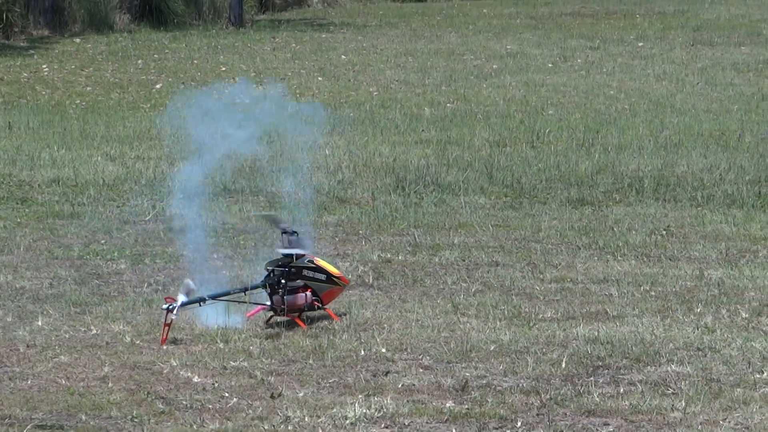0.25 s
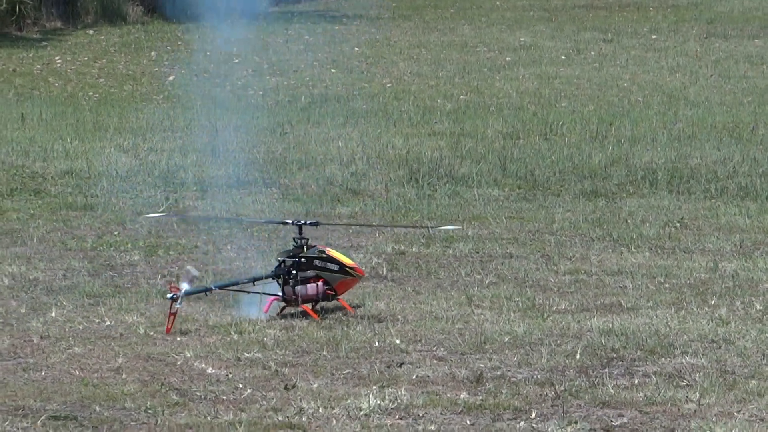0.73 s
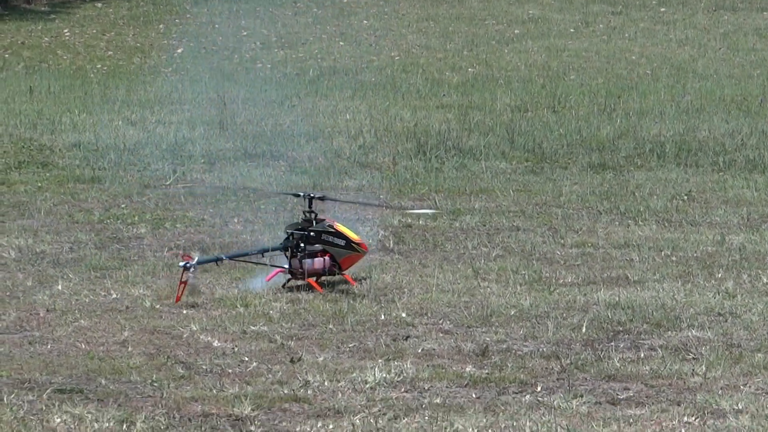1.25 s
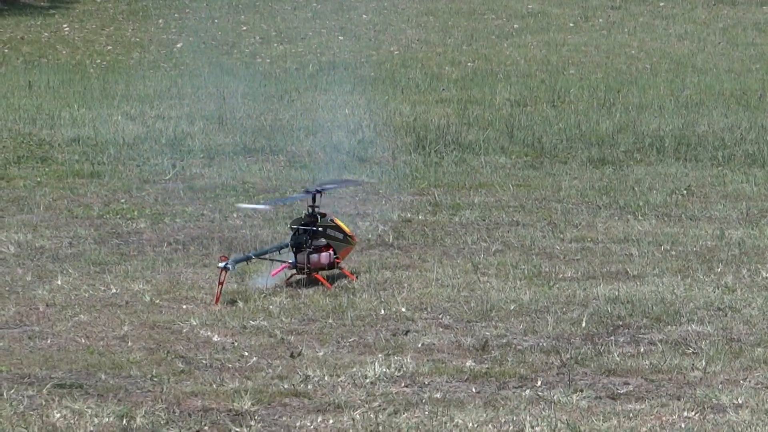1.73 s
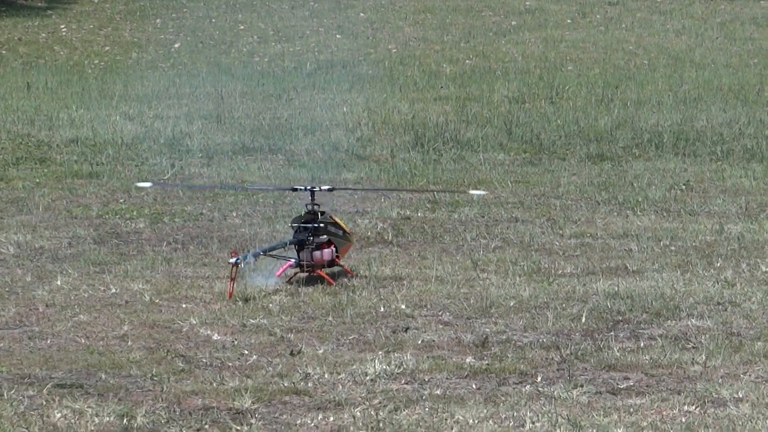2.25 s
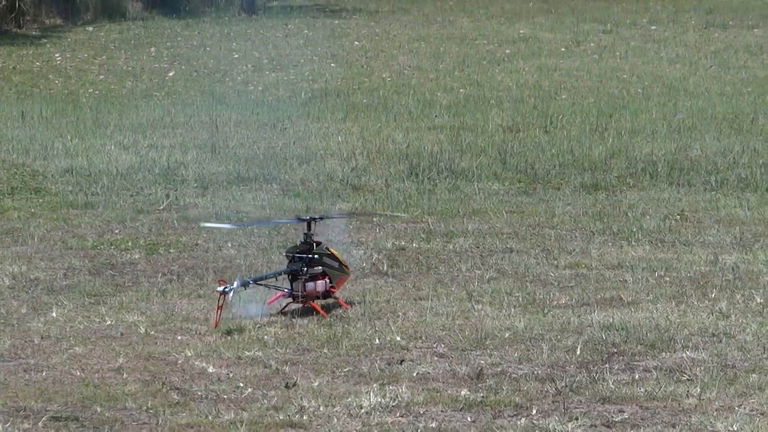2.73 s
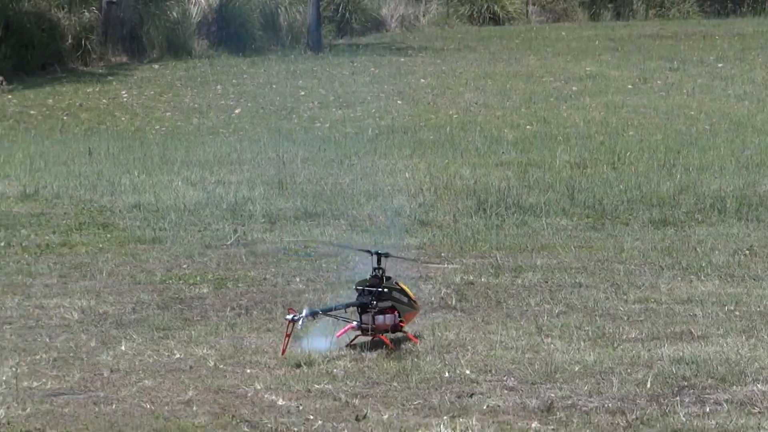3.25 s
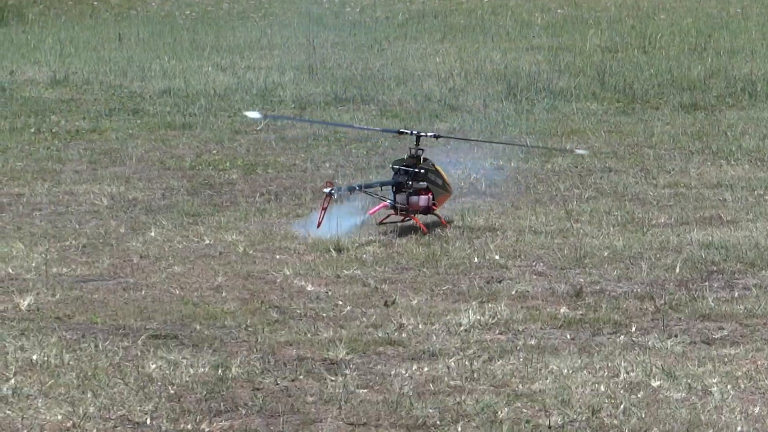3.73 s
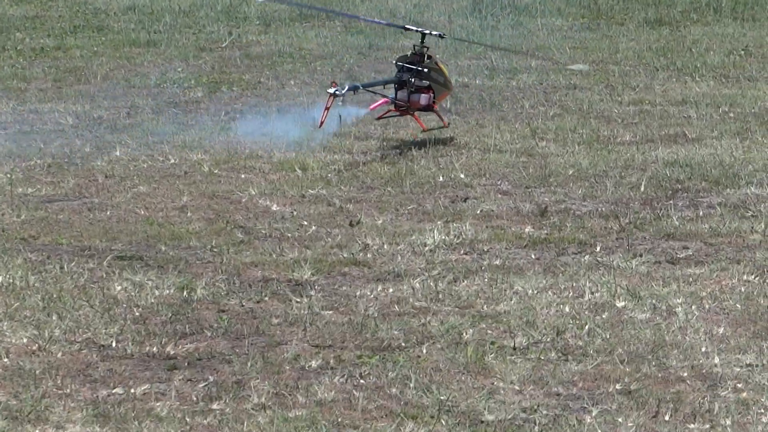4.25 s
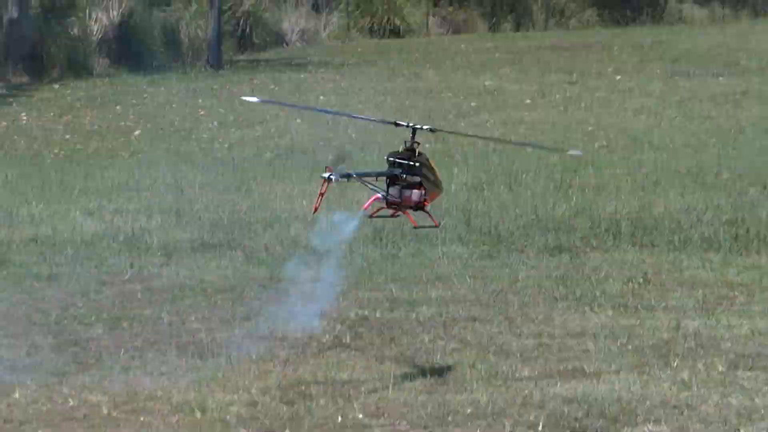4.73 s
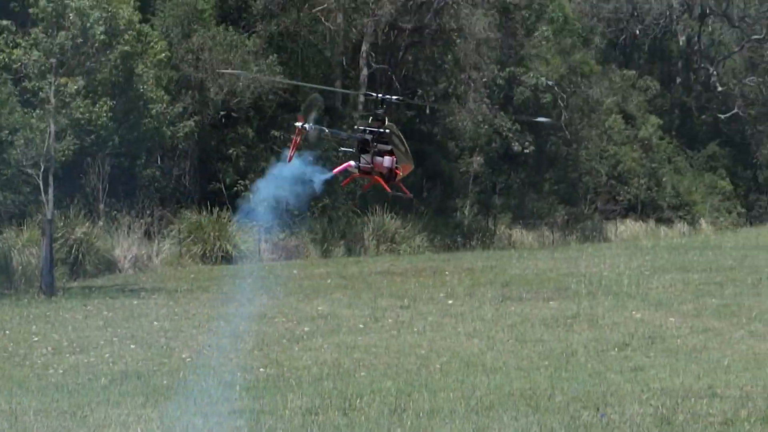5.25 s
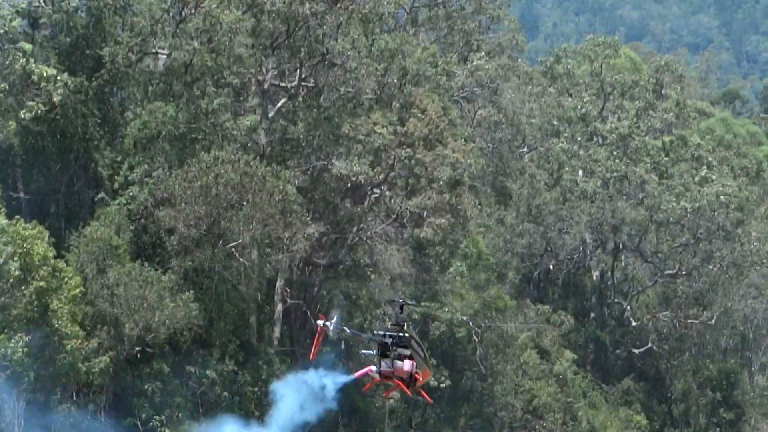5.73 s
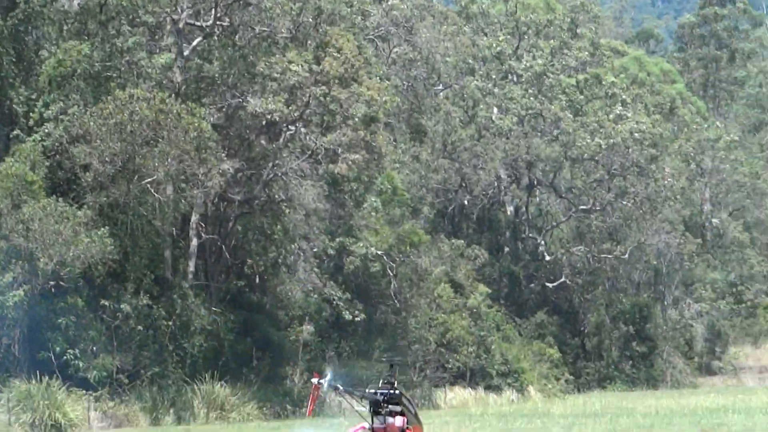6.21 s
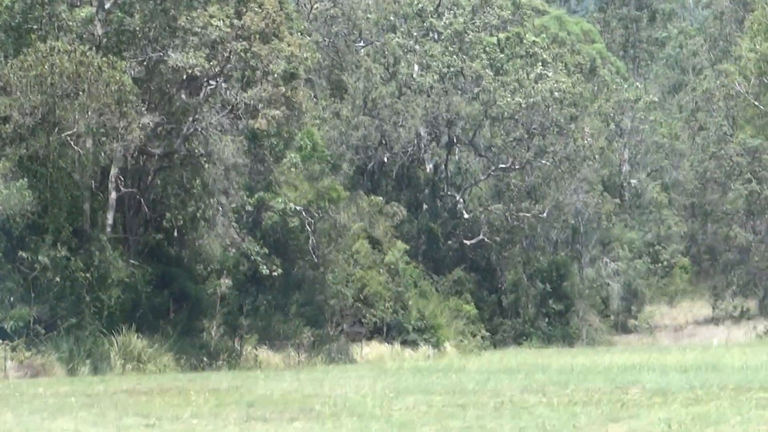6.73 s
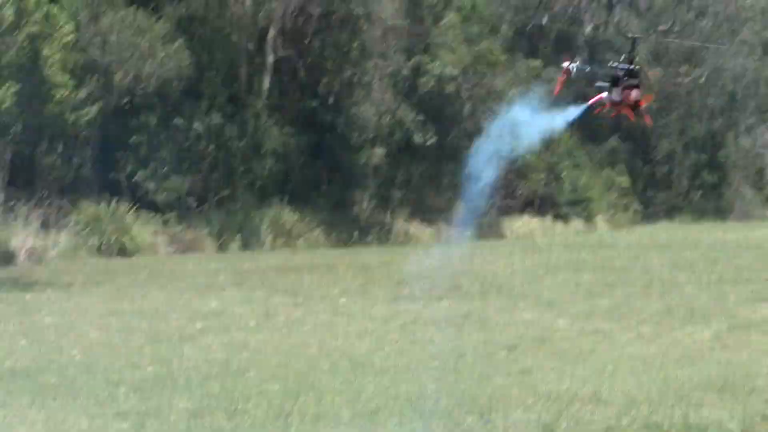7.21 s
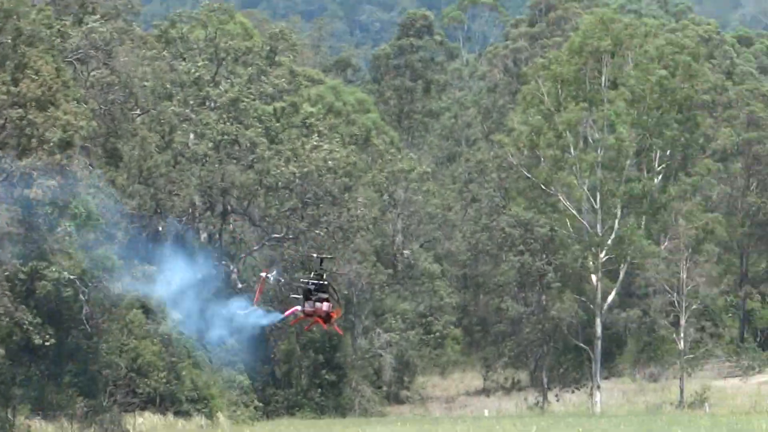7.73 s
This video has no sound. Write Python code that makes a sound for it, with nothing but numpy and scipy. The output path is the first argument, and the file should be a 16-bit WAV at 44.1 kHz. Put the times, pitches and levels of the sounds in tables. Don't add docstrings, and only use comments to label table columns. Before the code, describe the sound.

A small glow-fuel model helicopter is already running on open grass, some way from the microphone, with no noticeable room echo. From 0 to about 2.5 seconds its fast, nasal buzz and strong gear whine stay nearly level, sinking slightly around 1.3, where a faint short low knock touches the camera. A broad, bright hiss of exhaust and air covers everything. From about 2.7 the pitch creeps up while the slower rotor gradually catches up; by 4 to 5 seconds it is airborne, and the sound is harder, rougher and more fluttering. High whines flash and fade as it turns. Near 5.9 the rotor locks to the engine, and the tail blades sing more clearly. Pitch climbs sharply from 5.8 to 6.7, drops around 7, with a fuller low-mid swell, then rises steadily to its highest at 8, cut off still running.

```python
import sys
import numpy as np
from scipy import signal
from scipy.io import wavfile
from scipy.ndimage import uniform_filter1d

SR = 44100
rng = np.random.default_rng(int(sys.argv[2]) if len(sys.argv) > 2 else 0)


def boost(x):
    u = np.asarray(x, float) / 20
    return 10 ** u


def inscribe(sig):
    pcm = np.round(np.clip(np.atleast_2d(sig).T, -1, 1) * 32767)
    wavfile.write(sys.argv[1], SR, pcm.astype(np.int16))


N = 351477

GEAR = 8.5
TAIL_ORDER, MESH_ORDER = 1.06, 20.05
# start_s (centre), half_length_s, pitch_hz, half_width_oct, gain_db
GLINTS = [(.7, 0.67, 4700, .08, 4), (2.3, 0.8, 4600, .08, -3), (3.6, .35, 4750, 0.074, 5),
          (5, .5, 4950, .05, 3), (4.64, .25, 3650, 0.086, 2), (4.9, .7, 12400, .06, 14),
          (5.88, .17, 5040, 0.08, 9.5), (6.3, .25, 8100, .1, 13), (6.45, .1, 5605, .08, -6),
          (6.92, .08, 5500, .08, -7), (7.12, 0.072, 5460, 0.11, 9), (7.4, 0.079, 5650, .08, -5),
          (6.1, .2, 8550, .1, -5), (7.9, 0.3, 8700, .12, -12), (7.1, .8, 15000, .15, -16),
          (4.3, 0.16, 7350, .05, 6.5), (7.97, 0.15, 5950, .1, 8.5)]


def walk(rate):
    block = 32
    hold = int(SR / rate / block)
    coarse = np.repeat(rng.standard_normal(N // block // hold + 2), hold)
    coarse = uniform_filter1d(uniform_filter1d(coarse, hold), hold)
    return 1.3 * np.interp(np.arange(N) / block, np.arange(len(coarse)), coarse)


def curve(table):
    s, value = np.transpose(table)
    return np.interp(np.arange(N) / SR, s, value)


def on_hz(table, hz):
    table_hz, db = np.transpose(table)
    return np.interp(np.log(hz + 1), np.log(table_hz + 1), db)


def tone(turns, db, flutter_db, wander):
    start = rng.random()
    size = np.sqrt(2) * boost(db + flutter_db * walk(rate=40))
    return size * np.sin(2 * np.pi * (turns + start + wander * walk(rate=30)))


def swings(table, s, hz):
    total_db = 0
    for at_s, half_s, centre_hz, octaves, db in table:
        total_db = total_db + db * np.exp(-((s - at_s) / half_s) ** 2 - (np.log2(hz / centre_hz) / octaves) ** 2)
    return total_db


def flown(s, mean_db, *per):
    # time_s, load (-1..1), heading (-1..1), tilt (-1..1)
    flight = [(0.0, -0.75, -0.46, 0.13), (1.17, -0.72, -0.35, 0.15), (1.43, -0.95, 0.068, 0.2),
              (2.45, -0.75, 0.23, 0.089), (3.1, -0.68, -0.27, 0.075), (3.82, 0.31, 0.39, 0.16),
              (4.37, 0.54, 0.72, 0.2), (4.87, 1.0, 0.31, -0.058), (5.23, 0.35, -0.33, -0.54),
              (5.8, 0.42, -0.38, -0.55), (6.13, 0.08, -0.37, -0.51), (6.43, 0.43, 0.16, 0.28),
              (6.61, 0.049, -1.0, 0.47), (6.88, 0.55, 0.031, 0.3), (7.1, -0.095, -0.22, -0.66),
              (7.23, 0.18, -0.69, 0.13), (7.7, 0.7, 0.01, 1.0), (7.97, 0.68, -0.09, 0.6)]
    times_s, *controls = np.transpose(flight)
    return mean_db + sum(db * np.interp(s, times_s, c) for db, c in zip(per, controls))


def order_levels(crank_hz):
    # order, mean_db, db_per_load, db_per_heading, db_per_tilt
    orders = [
        (1.0, -48, 6.5, -2.5, 1.5),
        (3.0, -36.5, 6, -4, -9),
        (4.0, -46, -4, -2, 13),
        (5.0, -38, 14.5, -8.5, 5),
        (6.0, -29.5, -0.1, -5.5, -2.7),
        (7.0, -37.5, 9.5, 8, 2.5),
        (8.0, -44, 9.5, 3, -9),
        (9.0, -41, -2.5, 12, -1),
        (10.0, -23.5, 3.6, -0.7, 1.3),
    ]
    # order, mean_db, db_per_load, db_per_heading, db_per_tilt
    whines = [
        (20, -34, -3.9, 1.7, -2.5),
        (30, -37, 2, 0, 9),
        (50, -65, 2, 0.1, 5),
        (10.875, -40.5, 8.5, 4, -4.5),
    ]
    # centre_s, half_length_s, pitch_hz, half_width_oct, gain_db
    low_swings = [(2.8, .35, 1620, 0.1, -10), (4.05, 0.65, 965, .12, -12), (4.2, 0.43, 2640, 0.056, 8.5),
                  (4.55, .25, 2460, .07, 3), (4.85, 0.076, 2450, 0.11, -5.5), (4.95, .12, 990, 0.22, 10),
                  (5.2, 0.079, 2470, .1, -4), (5.6, .25, 2699, .04, -3), (5.95, 0.13, 2520, 0.074, -4.5),
                  (6.207, 0.16, 2370, 0.048, -7), (6.4, 0.23, 830, .15, 4), (6.496, 0.18, 2800, .12, 4.5),
                  (6.66, 0.072, 2850, .12, -7.5), (6.86, 0.035, 2800, .1, 1), (6.9, .07, 840, .2, -17),
                  (6.93, .09, 1950, .15, 10), (6.96, 0.079, 1600, .1, 10), (6.97, 0.036, 2730, .12, -13),
                  (7.05, 0.18, 1080, 0.17, 14), (7.1, 0.049, 2730, 0.08, -8), (7.15, .08, 2450, .05, 8),
                  (7.32, 0.14, 2790, .08, 2.5), (7.45, .1, 2260, .1, -7), (7.96, 0.046, 2960, .1, -11)]
    patch_db, fade_db_per_octave = 2, -43
    t = np.arange(N) / SR
    s, slow_hz = t[::256], crank_hz[::256]
    lead_db = {}
    for k, *row in list(orders) + list(whines):
        swing_db = swings(low_swings, s, k * slow_hz) + swings(GLINTS, s, k * slow_hz)
        lead_db[k] = np.interp(t, s, flown(s, *row) + swing_db)
    for k, *_ in whines:
        lead_db[k] += patch_db * walk(rate=5.5)
        lead_db[k] += (k > 25) * fade_db_per_octave * np.log2(crank_hz / 245)
    return lead_db


def shaft(crank, lead_db):
    # order, leading_order, swing_share (0-1; negative: against the leader), mean_db
    followers = [(2.005, 4, 0.08, -39.5), (11.08, 10, 0.8, -49.5), (11.94, 6, 0.06, -37),
                 (12.86, 8, 0.36, -43.5), (13.8, 7, 0.29, -42), (15.34, 5, 0.5, -41.5),
                 (15.8, 5, 0.21, -50), (17.9, 6, 0.29, -48), (18.61, 9, 0, -38), (30.62, 30, 0.7, -35.5),
                 (41.2, 20, 0.38, -46), (41.8, 50, 0, -47.5), (49.5, 50, 0.6, -56), (3.605, 3, -.2, -49.5),
                 (7.25, 5, 0.75, -51), (10.6, 10, 1, -82), (9.867, 10.875, 0.58, -42.5)]
    # start_s, end_s, level_db
    lean_row = (3.0, 4.2, -65)
    t = np.arange(N) / SR
    crank = crank + 0.0071 * walk(rate=90)
    rock = np.sin(2 * np.pi * crank / GEAR)
    load = np.interp(t, (0, 3.6, 4.1, 4.6, 5.6, 6.2, 8), (0.36, 0.53, 0.99, 0.37, 0.23, 1.0, 0.93))
    out = 0
    for k, db in lead_db.items():
        tooth = 0.061 * load * rock * (k == 10)
        line = tone(k * crank + tooth, db, flutter_db=0.07 + 0.013 * k, wander=0.019 + 0.00063 * k)
        out += line * (1 + 0.086 * load * rock)
    for k, lead, share, db in followers:
        swing_db = share * (lead_db[lead] - lead_db[lead].mean())
        out += tone(k * crank, db + swing_db, flutter_db=0.53 + 0.088 * k, wander=0.0044 * k)
    start_s, end_s, lean_db = lean_row
    lean = np.clip(np.minimum(t - start_s, end_s - t) / 0.11, 0, 1)
    for k, db in enumerate((-14, 4.1, 9)):
        out += lean * tone((k + 0.5) * crank, lean_db + db, flutter_db=5.5, wander=0.02)
    return out


def rotors(head, head_hz, share):
    # head_hz (crank scale), tail_blade_db, tail_gear_db, main_beat_db
    growth = [(80.4, -80, -43, -93), (115, -89, -48, -96), (130, -78, -31, -107), (151, -79, -38, -74),
              (159.8, -64, -29.5, -91), (192.6, -54, -26.5, -85), (215, -50, -39, -86),
              (242, -56, -26, -82), (251, -50, -31.5, -76), (279, -46.5, -30, -65), (297, -40.5, -31, -65)]
    t = np.arange(N) / SR
    speed_hz, *parts = np.transpose(growth)
    tail_db, whine_db, beat_db = (np.interp(head_hz, speed_hz, db) for db in parts)
    whine_db = whine_db + np.interp(t, t[::256], swings(GLINTS, t[::256], MESH_ORDER * head_hz[::256]))

    slack_db = -55 * (1 - share)
    out = 0
    # harmonic, level_db, weight of slack
    for k, db, slack in ((1, 0, 0), (2, 1.5, 1), (3, -8, -.55), (4, -10, -.55), (5, -10, -.6), (6, -11, -.55)):
        out += tone(k * TAIL_ORDER * head, tail_db + db + slack * slack_db, flutter_db=2.3 + k / 3, wander=0.018)

    mesh = MESH_ORDER * head + 0.17 * walk(rate=150)
    rough = 0.5 * (1 - share) * walk(rate=250)
    shaft_turn = 1 + 0.36 * np.sin(2 * np.pi * TAIL_ORDER / 2 * head)
    out += tone(mesh + rough, whine_db, flutter_db=1.5, wander=0.12) * shaft_turn
    out += tone(2 * mesh, whine_db - 18, flutter_db=5.5, wander=0.25)

    for k in range(1, 9):
        out += tone(2 * k * head / GEAR, beat_db + 0.6 * k - 4.56 * (k == 1), flutter_db=3.0, wander=0.11)
    return out


def hiss(crank, head, share):
    # pitch_hz, level_db_per_hz
    ground = [(40, -50), (150, -36.5), (320, -24.5), (860, -16), (1080, -22), (1400, -11), (1850, -15.5),
              (2500, -6.5), (4000, -2.5), (6200, -3.5), (8000, -4.5), (10500, -7.5), (12500, -20.5),
              (15500, -31)]
    # pitch_hz, width_hz, gain_db
    rings = [(3914, 400, 4.5), (4800, 410, 3), (6980, 340, 4.5), (9540, 270, 6)]
    # pitch_hz, half_width_oct, mean_db, db_per_load, db_per_heading, db_per_tilt
    lifts = [
        (150, 2, 2, -2.5, -1, 5),
        (786, 0.68, 1.5, 5.5, -5.5, 1),
        (1900, 0.62, 3, 3.5, 1, 1),
        (13000, .8, 1.5, 0.7, -0.4, 0.8),
    ]
    # centre_s, half_length_s, pitch_hz, half_width_oct, gain_db
    jet_turns = [(1.53, 0.21, 6500, 1.2, -2.5), (3.2, 0.75, 13500, 0.96, -3.5), (8.9, 0.17, 1100, 0.6, 4),
                 (5.8, 0.079, 12400, 0.59, -5), (6.2, .2, 9900, .12, 4.5), (4.47, 0.21, 9900, 0.088, 2),
                 (4, .5, 950, .3, -4), (5.85, 0.13, 6600, .3, -1.5), (6.6, .15, 4000, .3, 2),
                 (6.43, 0.3, 800, 0.53, 1.5), (5.9, .3, 90, 1.1, 3), (1.1, .04, 200, 1.1, 8),
                 (7.4, 0.16, 18000, 0.37, 0), (5.55, .12, 10200, .3, 3), (0.7, 0.19, 9700, 0.46, 1),
                 (3.94, 0.18, 8500, .5, -1.5), (6.9, 0.28, 1300, 1.03, 8.5)]
    # pitch_hz, side_minus_mid_db
    width = [(60, -25), (110, -31), (200, -19), (380, -11), (700, -13.5), (1290, -27), (2380, -18.5),
             (4400, -14.5), (8120, -16.5), (15000, -26)]
    # mean_db, db_per_load, db_per_heading, db_per_tilt
    air = (-18.5, -1.2, 0.74, -0.7)
    hz, s, spectra = signal.stft(rng.standard_normal((2, N)), SR, nperseg=512)
    column_hz = hz[:, None]
    db = on_hz(ground, hz)[:, None]
    hot = np.interp(s, (0, 4.0, 4.5), (0, 0, 1))
    for ring_hz, width_hz, gain_db in rings:
        drift = np.interp(s * SR, np.arange(N), walk(rate=9))
        swell = np.clip(1 + (0.11 + 0.27 * hot) * drift, 0, 3)
        off_hz = column_hz - ring_hz * (1 + 0.016 * hot)
        db = db + gain_db * swell / (1 + (2 * off_hz / width_hz) ** 2)
    for centre_hz, octaves, *row in lifts:
        shape = np.exp(-(np.log2((column_hz + 1) / centre_hz) / octaves) ** 2)
        db = db + shape * flown(s, *row)
    db = db + swings(jet_turns, s, column_hz + 1)
    patches = uniform_filter1d(rng.standard_normal(db.shape), size=24, axis=0)
    patches = uniform_filter1d(patches, size=12, axis=1)
    db = db + 0.5 * patches / patches.std()
    flicker_db = uniform_filter1d(rng.standard_normal(len(s)), size=10)
    flicker_db = flicker_db * np.interp(s, (0, 4.0, 5.0), (1.5, 1.5, 4.5))
    db = db + np.clip((column_hz - 6000) / 6000, 0, 1) * flicker_db
    spectra[1] *= boost(on_hz(width, hz) + 3.5)[:, None]
    noise = signal.istft(spectra * boost(db), SR, nperseg=512)[1][:, :N]
    noise = noise / noise[0].std() * boost(flown(np.arange(N) / SR, *air) - 1.04)
    puff = 1 + 0.077 * np.cos(2 * np.pi * crank) + 0.021 * np.cos(np.pi * crank)
    bite = np.clip((share - 0.6) / 0.4, 0, 1)
    sweep = 0.066 * np.sin(2 * np.pi * head / GEAR) + 0.036 * np.sin(4 * np.pi * head / GEAR)
    return noise * puff * (1 + bite * sweep)


def camera_knock():
    # start_s, peak_db, pitch_hz
    knock_row = (1.3105, -25, 320)
    start_s, peak_db, pitch_hz = knock_row
    t = np.clip(np.arange(N) / SR - start_s, 0, 1)
    rise_s = 0.002
    envelope = t / rise_s * np.exp(1 - t / rise_s)
    return boost(peak_db) * envelope * np.sin(2 * np.pi * pitch_hz * t * (1 - 12 * t))


def downwash(share):
    low = signal.butter(2, 60, fs=SR, output="sos")
    rumble = signal.sosfilt(low, rng.standard_normal(N))
    gusty = boost(-71 + 2.5 * walk(rate=8))
    return rumble / rumble.std() * gusty * np.clip((share - 0.64) / 0.05, 0, 1)


def port_shading(tones):
    t = np.arange(N) / SR
    band = signal.butter(2, (1300, 3100), "band", fs=SR, output="sos")
    drift = np.interp(t, (0, 1.8, 2.3, 5.0, 8), (0.032, 0.063, 0.12, 0.14, 0.15))
    return drift * signal.sosfilt(band, tones) + 0.03 * np.roll(tones, 40)


def scene():
    # time_s, crank_hz
    crank_speed = [(0, 235), (1.15, 235.2), (1.4, 230.4), (2.55, 229), (2.7, 229.2), (3.35, 234.8),
                   (3.95, 241.6), (4.71, 248.2), (5.46, 246.5), (5.75, 248.3), (6.46, 280), (6.68, 285),
                   (6.82, 283.9), (7.0, 269.2), (7.09, 269.5), (7.24, 276.2), (7.61, 287.4), (7.97, 297)]
    # time_s, share of locked head speed
    slip = [(0, .33), (1, .44), (2.5, .58), (3, .6), (3.8, .662), (4.28, .701), (4.4, .713), (4.91, .791),
            (5.04, .815), (5.36, .899), (5.62, .954), (5.76, .974), (5.92, 1), (8, 1)]
    crank_hz, share = curve(crank_speed), curve(slip)
    head_hz = crank_hz * share
    crank, head = np.cumsum(crank_hz) / SR, np.cumsum(head_hz) / SR
    tones = shaft(crank, order_levels(crank_hz)) + rotors(head, head_hz, share)
    mid, side = hiss(crank, head, share)
    side = side + port_shading(tones)
    mid = mid + tones + camera_knock() + downwash(share)
    return np.array([mid + side, mid - side])


def low_pass(x):
    return signal.sosfilt(signal.butter(12, 15800, fs=SR, output="sos"), x)


def record(dry):
    high = signal.butter(2, 70, "high", fs=SR, output="sos")
    mix = signal.sosfilt(high, dry)
    return low_pass(mix)


dry = scene()
out = record(dry)
inscribe(out)
```